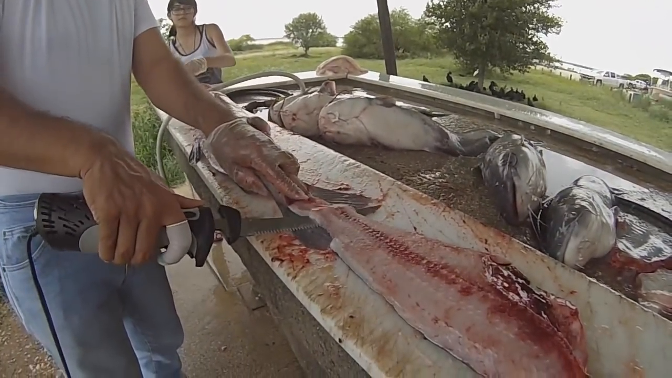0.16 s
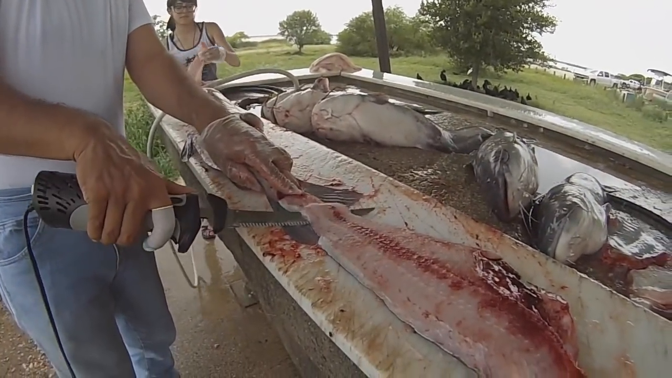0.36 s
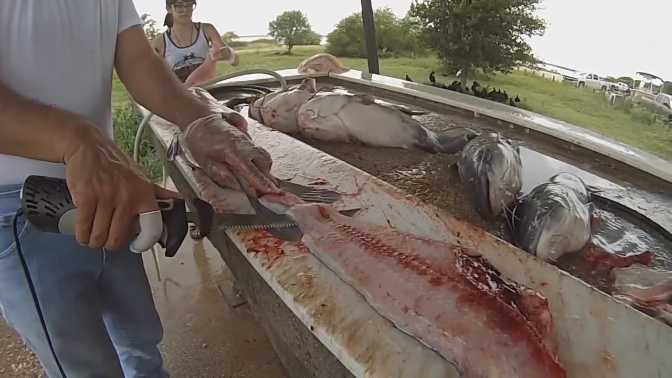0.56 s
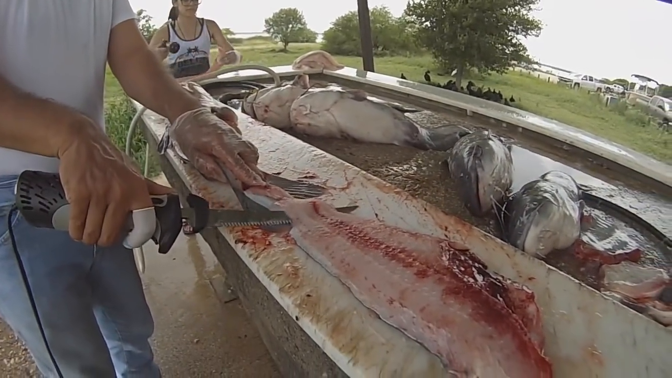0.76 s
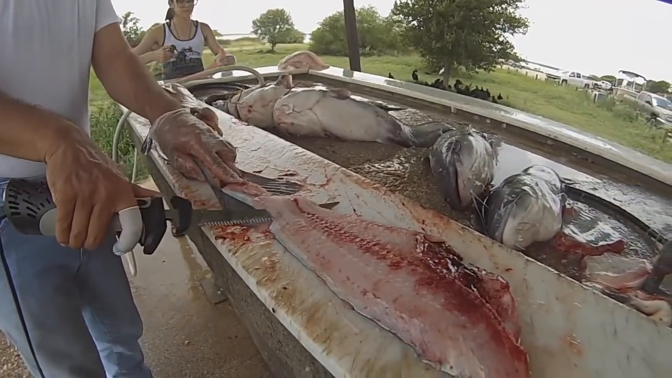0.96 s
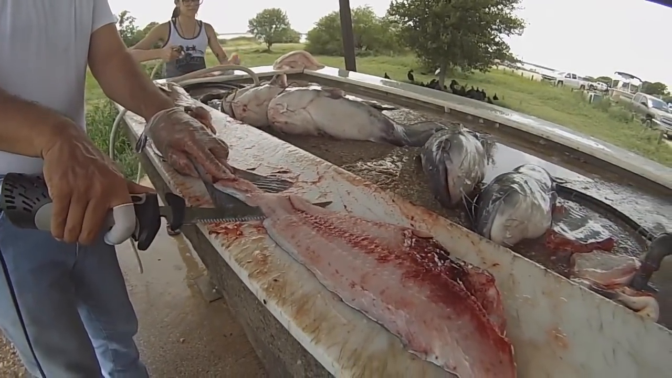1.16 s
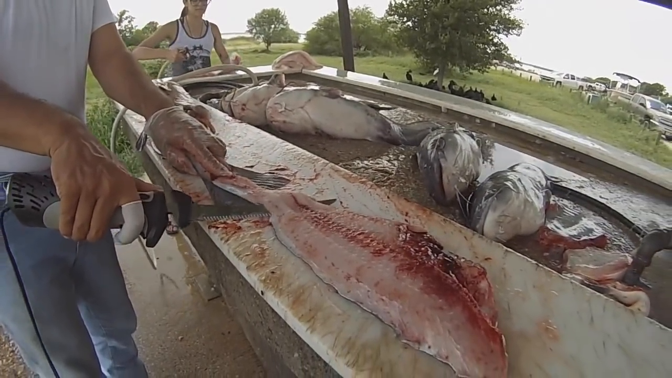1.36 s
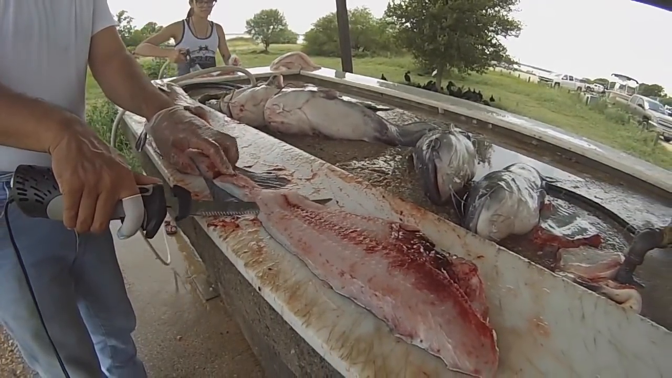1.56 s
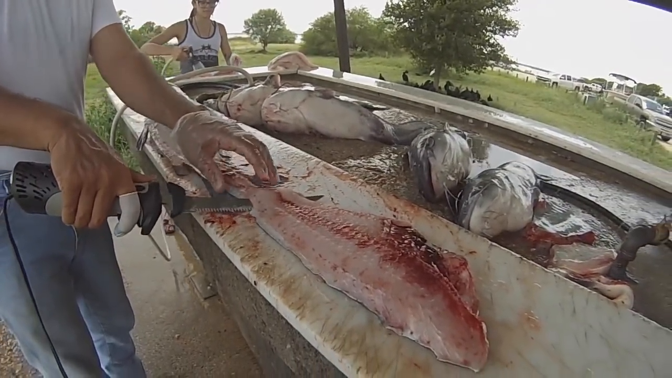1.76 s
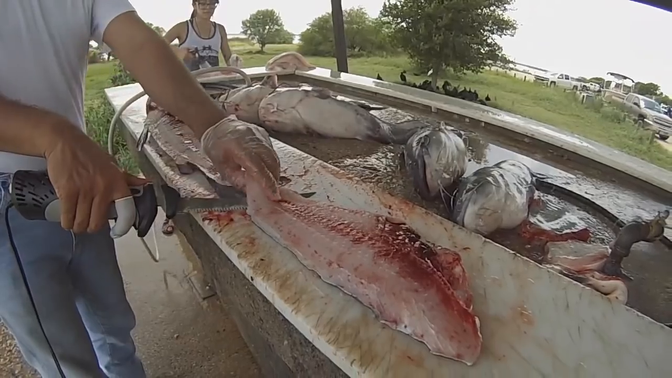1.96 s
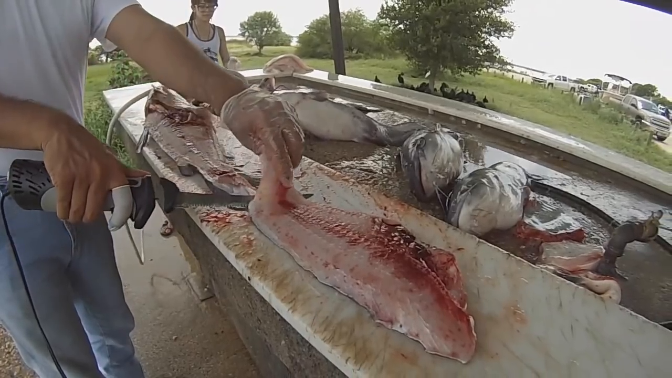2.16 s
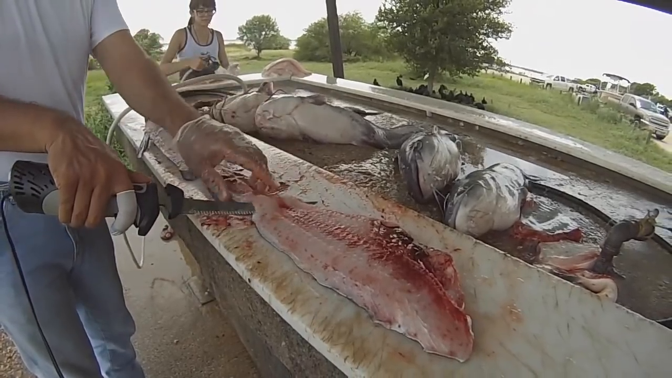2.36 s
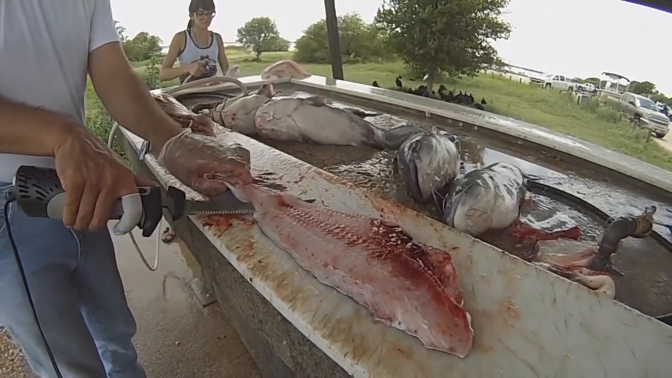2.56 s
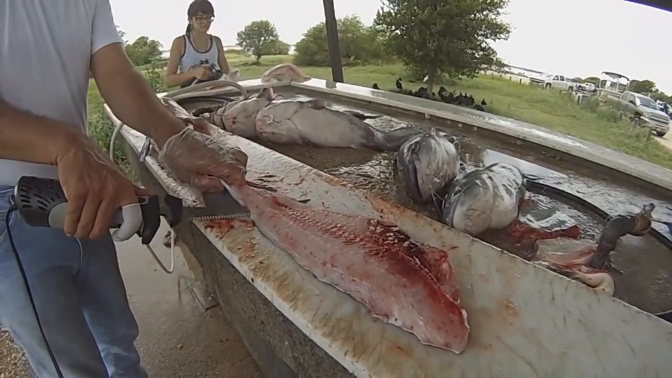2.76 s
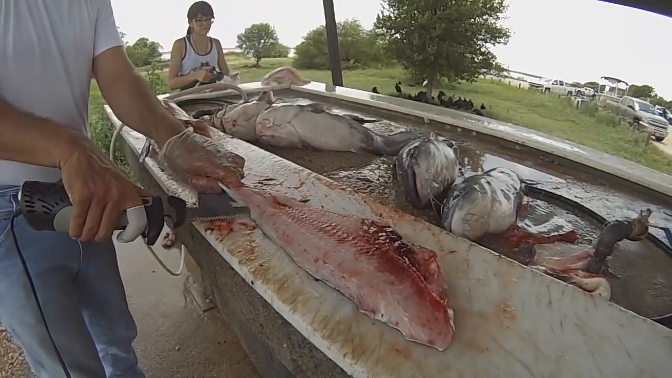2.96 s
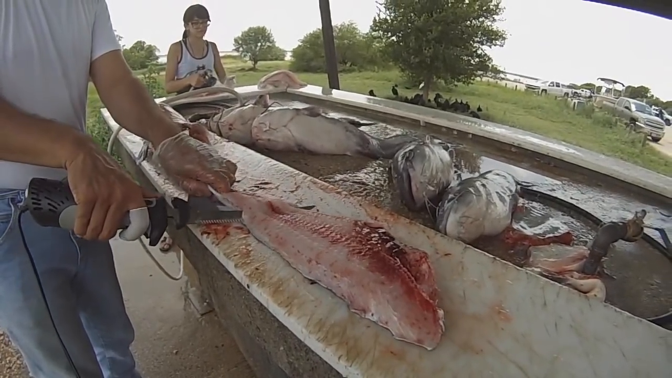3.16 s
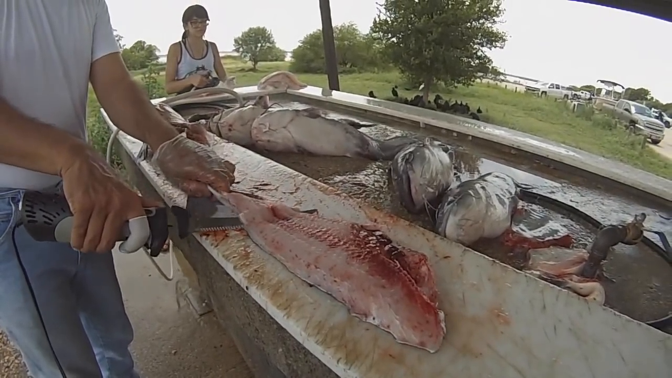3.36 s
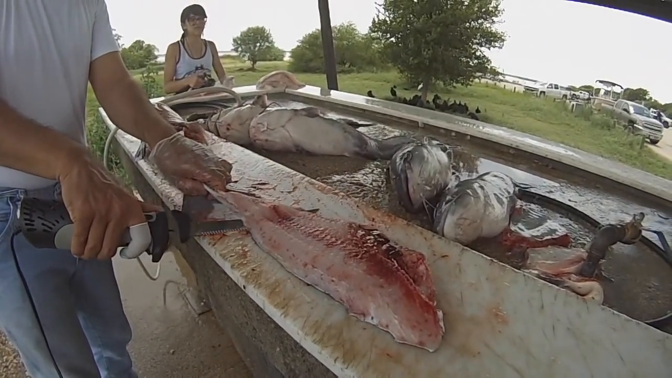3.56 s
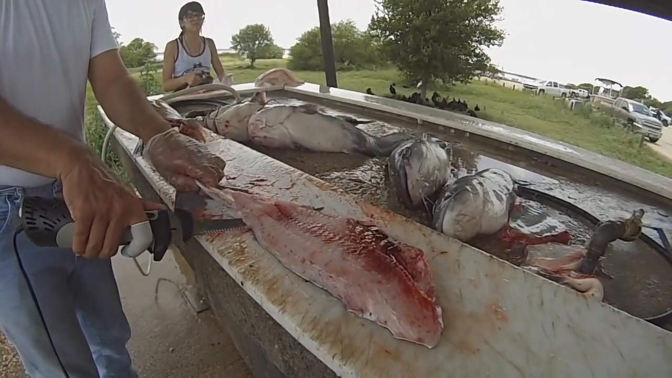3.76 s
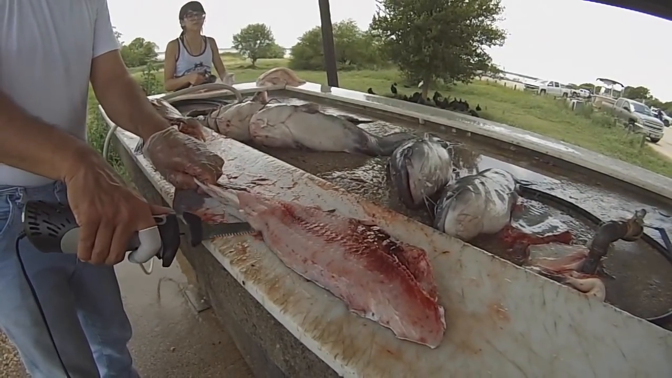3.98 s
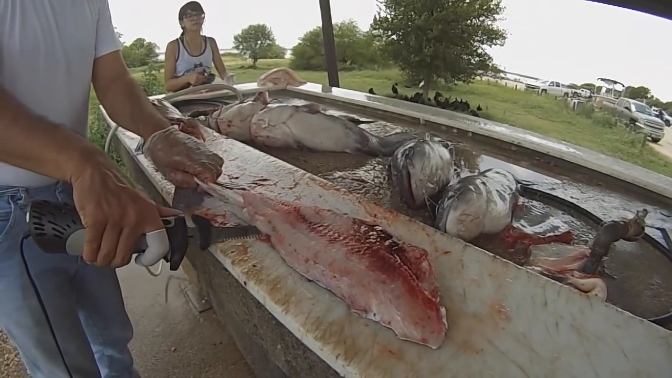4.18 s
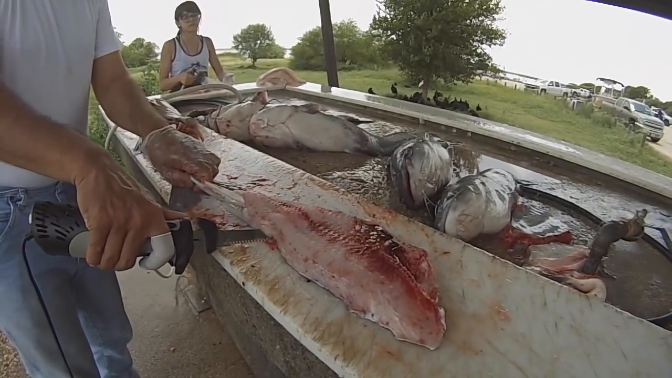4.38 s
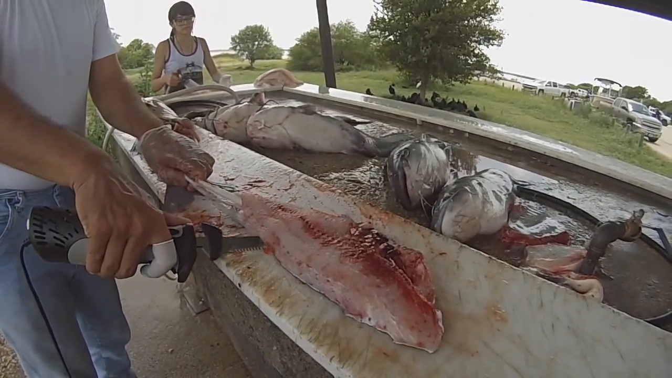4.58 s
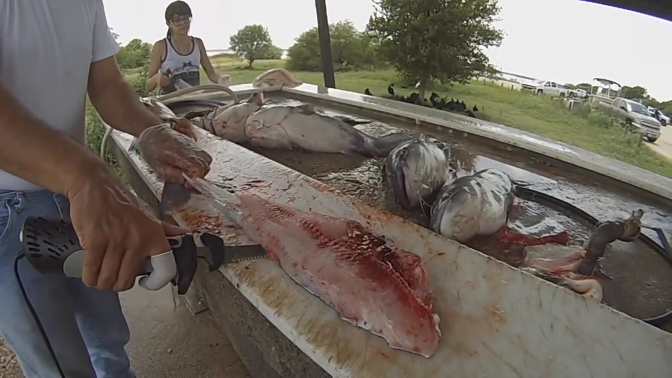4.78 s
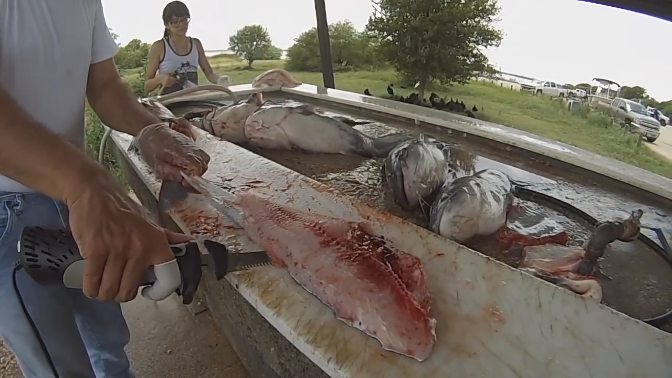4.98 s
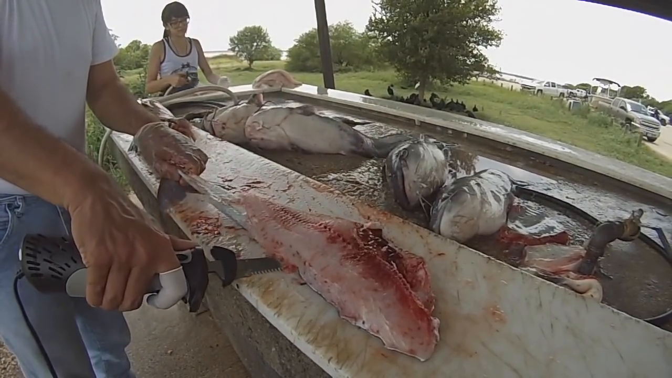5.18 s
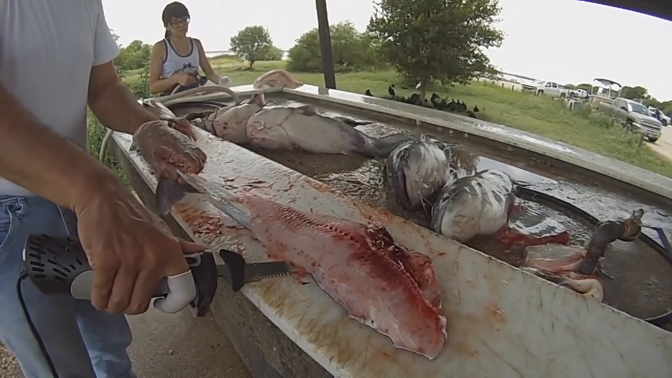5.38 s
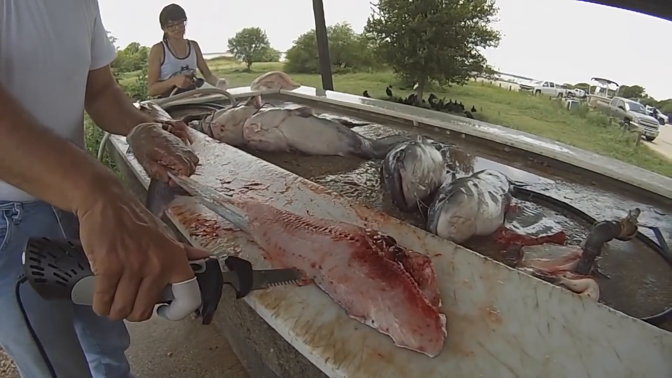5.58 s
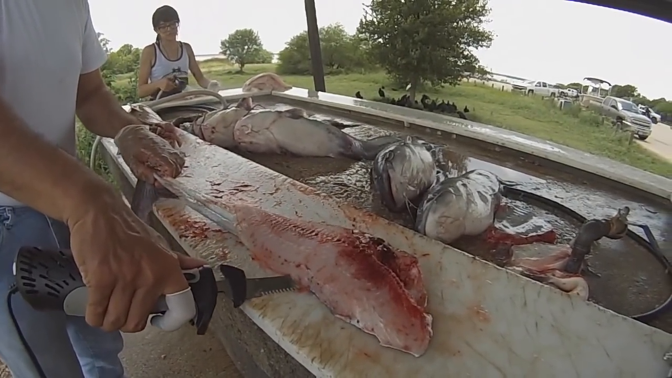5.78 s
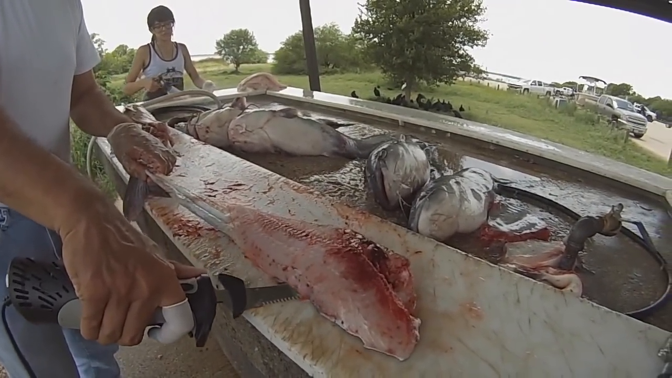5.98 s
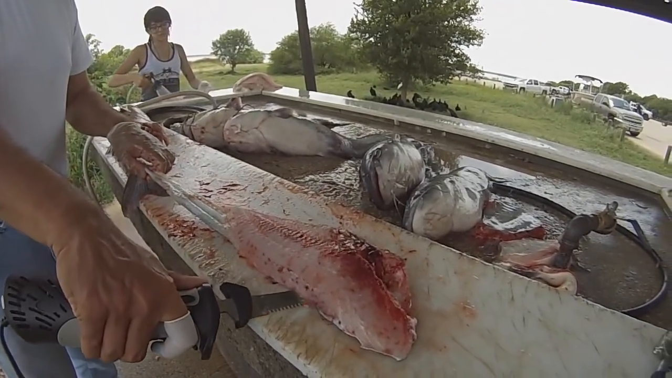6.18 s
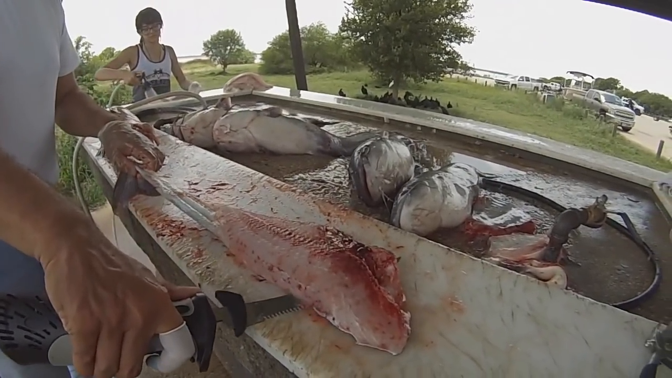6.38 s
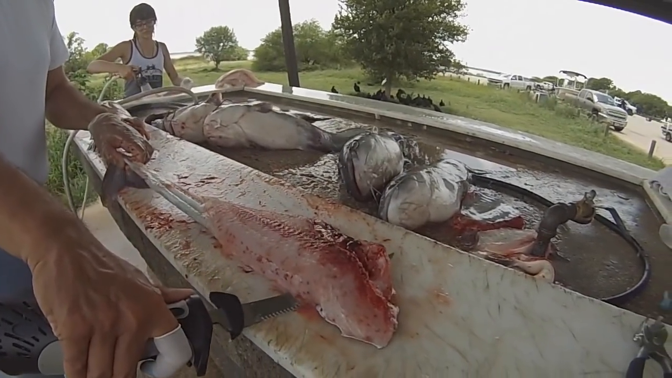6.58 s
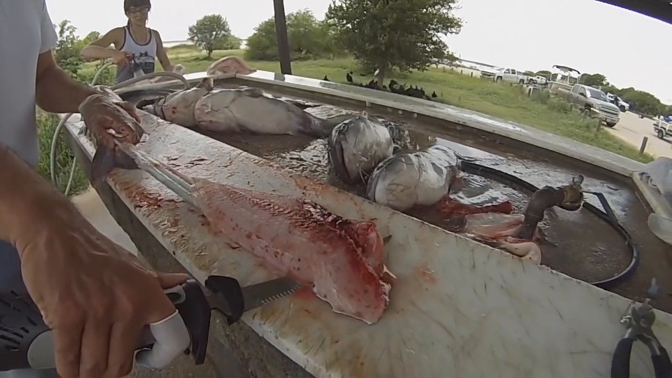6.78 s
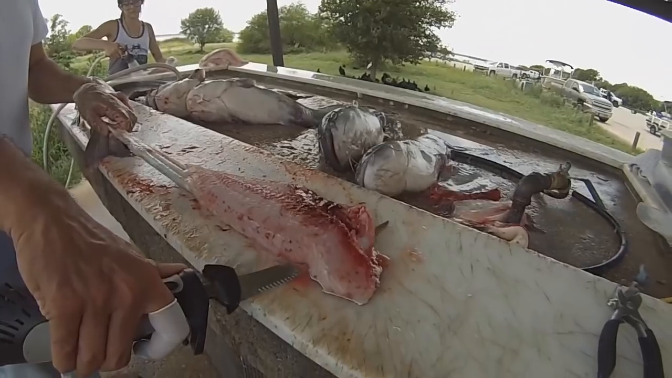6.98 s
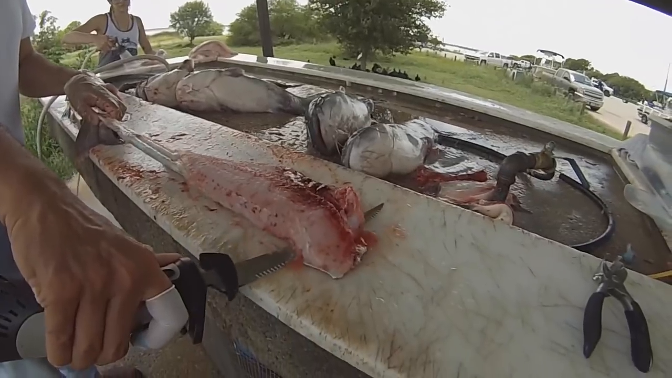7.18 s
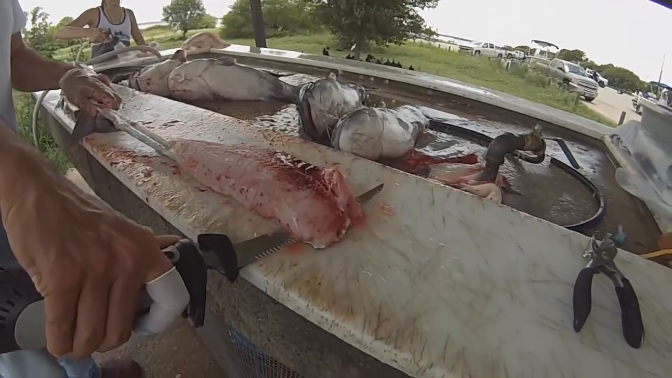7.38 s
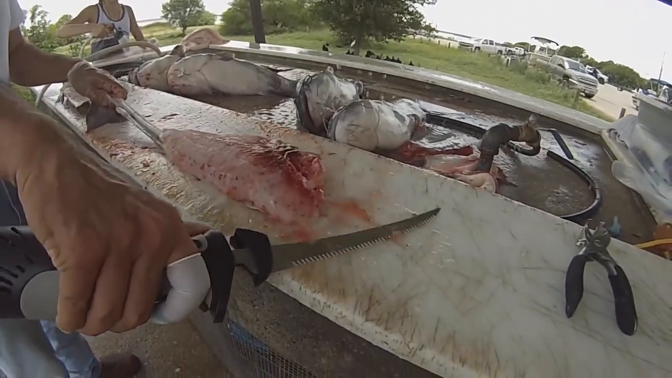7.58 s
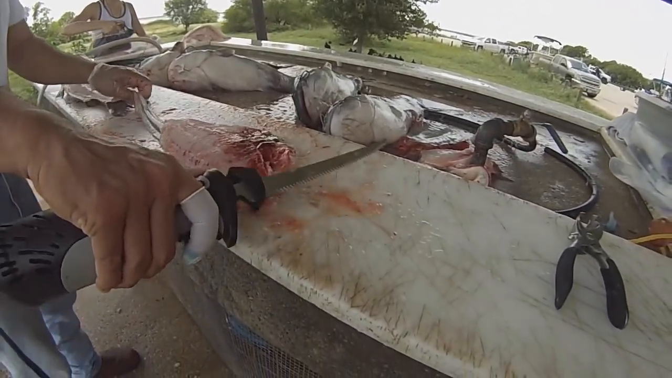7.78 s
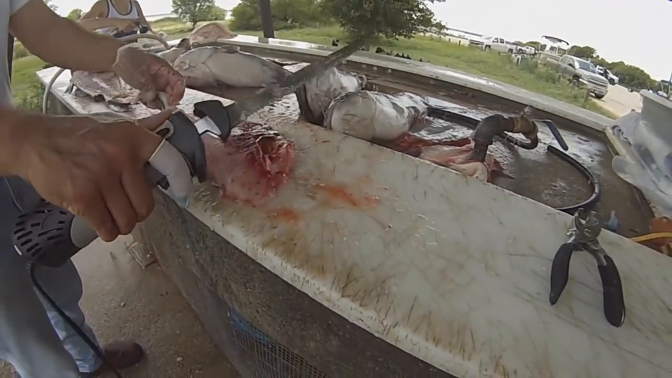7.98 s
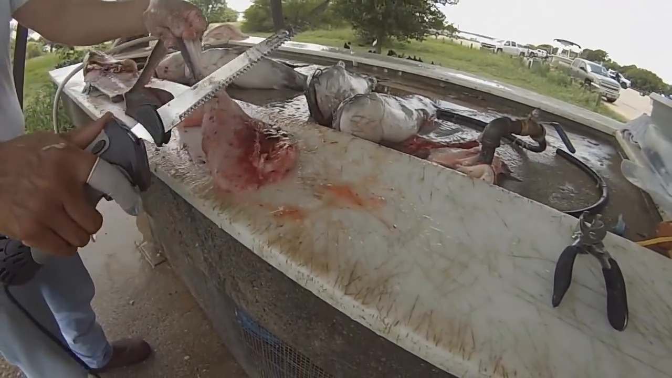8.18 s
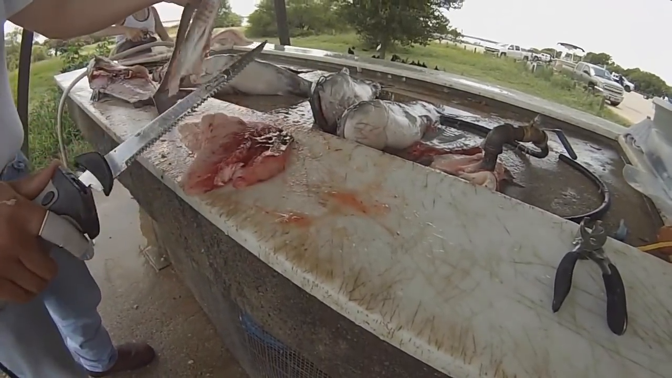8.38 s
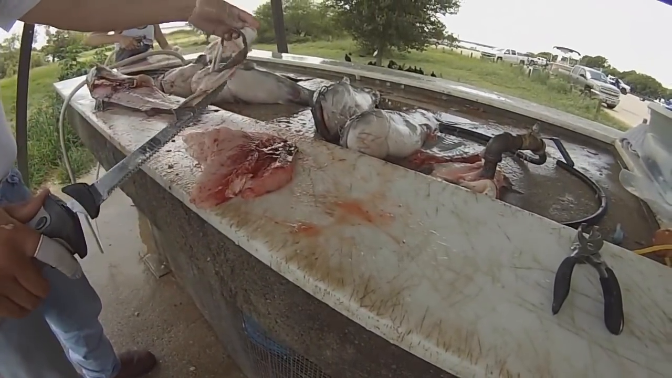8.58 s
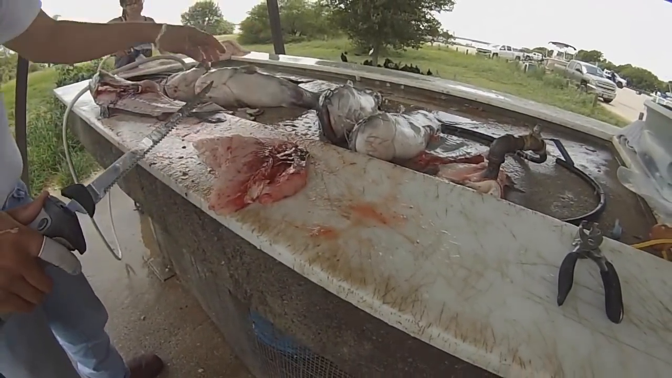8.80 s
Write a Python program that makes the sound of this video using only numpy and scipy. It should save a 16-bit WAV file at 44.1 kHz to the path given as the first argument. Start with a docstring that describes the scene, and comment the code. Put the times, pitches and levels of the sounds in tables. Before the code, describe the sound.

An electric fillet knife buzzes in three short bursts with clacking coasts, then one long rattling cut, before winding down in the open air.

```python
"""Outdoor rumble and insects lie under an electric fillet knife already coasting at the start, on a fish
on a table: three short bursts, one long cut, then it is lifted away. The motor spins up while the trigger
is held and coasts between; its speed sets the rate and loudness of the parts. Teeth rattle and sing in
the plastic housing, the crank knocks at the stroke ends, steel blades scrape, sizzle and clack.
Noise and contact impulses ring filters for these; sines make the motor, the mesh and a far engine."""
import sys
import numpy as np
from scipy import signal
from scipy.fft import rfft, irfft, next_fast_len
from scipy.io import wavfile
from scipy.ndimage import map_coordinates

SR = 44100
rng = np.random.default_rng(int(sys.argv[2]) if len(sys.argv) > 2 else 0)


def store_wav(level_fs):
    """Save 16-bit WAV to argv[1]."""
    pcm = np.round(np.clip(np.atleast_2d(level_fs), -1, 1) * 32767)
    wavfile.write(sys.argv[1], SR, pcm.T.astype(np.int16))


N = 389844

# The grip shifts the two main housing modes. Each row: time in seconds, main mode in Hz, lower mode in Hz.
GRIP_MODES = [(1.06, 1030, 620), (1.38, 1090, 646), (2.2, 1050, 590), (3.3, 1060, 665), (3.9, 1105, 810),
              (4.9, 1143, 770), (6.2, 1096, 800), (7, 1050, 800), (7.66, 970, 760), (7.88, 1106, 800),
              (8.3, 1090, 770), (8.5, 983, 820)]
# Whine of the rotor slots. Each row: multiple of the rotor speed, relative level in dB.
SLOT_WHINE = [(8, 0), (16, -1.5), (24, -3), (32, -7), (40, 0)]
# Single hard blade clacks, and the jolt as the motor starts again at 2.9 s. Each row: time in seconds, #
# relative level in dB, thud against the tick in dB, 60 dB decay of the rebounds in seconds.
SINGLE_CLACKS = [(0.126, -14, 14, 0.02), (.156, -12, 4, 0.0082), (0.184, -9, -2, 0.011),
                 (0.213, -8, 7, .01), (.467, -5.5, 4, 0.016), (.996, -6, -6, 0.019),
                 (1.614, -13.5, 11, .01), (1.64, -4.5, 1, 0.094), (1.674, -11, 13, .03),
                 (1.839, -14.5, -6, .012), (1.873, -11.5, -6, .01), (2.073, -21, 14, 0.019),
                 (2.096, -31, 19, .011), (2.118, -28, 18, .012), (2.145, -35, 8, .012),
                 (2.167, -32, 21, .012), (2.249, -20.5, 8, 0.015), (2.281, -25, 3, .012),
                 (2.314, -21.5, 5, .016), (2.351, -23, -1, .012), (2.385, -28, 16, .012),
                 (2.397, -30, 14, .012), (2.488, -38, 15, .012), (2.523, -36, 1, .012),
                 (2.594, -30, 15, .012), (2.655, -29, -7, 0.013), (2.69, -34, -7, .014),
                 (2.899, -38, 25, 0.088), (2.953, -27, 18, .014), (2.981, -20.5, 14, 0.018),
                 (3.022, -14.5, 12, 0.02), (3.101, -13, 12, .035), (3.132, -11.5, 10, .02),
                 (8.202, -11.5, 8, 0.017), (8.26, -6, -2, 0.022), (8.292, -9, 3, .017),
                 (8.355, -9, -2, .022), (8.442, -9, -5, 0.023), (8.479, -11.5, 3, 0.019),
                 (8.536, -11, -1, 0.012), (8.555, -15, 4, 0.021), (8.642, -14, -12, 0.023),
                 (8.688, -24, 7, .02), (8.713, -23, 3, .02), (8.737, -18, -5, .025),
                 (8.761, -16, -4, 0.026), (8.789, -20, 0, .02), (8.817, -15.5, 2, .025)]
# Colours of the housing, crank knock, blade scrape, wet sizzle, outdoor air, table and blade shanks.
# Each row: frequency in Hz, relative level in dB.
HOUSING_COLOUR = [(100, -29.5), (250, -23), (480, -10.5), (640, -2), (850, 1), (1000, 1), (1300, -1.5),
                  (1480, -4), (1700, -4.5), (2000, -10.5), (2300, -19), (3500, -12.5), (7000, -26),
                  (15000, -39.5)]
CRANK_COLOUR = [(120, -42.5), (400, 5), (800, 9.5), (1200, 5), (1500, 4), (1900, 12), (2500, -26),
                (3300, -22), (4000, -43), (4600, -6), (5400, -2), (6500, -1), (7500, -25), (15000, -50)]
BLADE_COLOUR = [(500, -10), (1900, 2), (2350, -4), (2650, -1), (2900, -1), (3400, 3), (4000, 1), (4600, -2),
                (5300, -6.5), (6400, -6.5), (7300, -14), (8300, -10), (9500, -19), (15000, -23.5)]
SIZZLE_COLOUR = [(4000, -30), (7000, 5.5), (9400, 0.5), (10200, 6), (10900, 9.5), (11600, -6), (12600, -10),
                 (13700, 7), (14600, -9), (15500, -18)]
AIR_COLOUR = [(15, -31), (25, -14), (42, 5), (70, 0), (130, -4), (210, -14), (300, -10.5), (440, -15.5),
              (1000, -19.5), (2000, -27.5), (3500, -27), (7000, -35), (15500, -31)]
TABLE_COLOUR = [(90, -13), (170, -1.5), (220, -19), (330, -7.5), (420, 3), (540, 0.5), (650, 1), (800, 6.5),
                (900, -4), (1500, -11.5), (6000, -89)]
SHANK_COLOUR = [(2500, -30), (3400, -19), (3680, 3.5), (4150, 0), (4520, -12), (5000, -7), (5800, -18.5),
                (6500, -9.5), (7300, -27), (12000, -36)]
# Tones of a far engine. Each row: frequency in Hz, level in dB.
FAR_ENGINE = [(48.5, -71), (122, -51), (152, -54.5), (289, -58.5)]
# Loose drive joints that strike once a stroke. Each row: share of the stroke, relative level in dB.
LOOSE_JOINTS = [(.11, -4.5), (.271, 0.5), (.42, -3.5), (.59, -2.5), (.65, -0.5), (.818, -0.5)]
# Two pitches of the free blade length. Each row: time in seconds, lower pitch in Hz, upper pitch in Hz.
BLADE_PITCHES = [(1.6, 1560, 1940), (2.2, 1660, 2000), (3.6, 1644, 2046), (4.4, 1656, 1970),
                 (5.6, 1710, 2030), (6.4, 1760, 2010), (6.8, 1340, 1870), (7.4, 1360, 1830),
                 (7.65, 1760, 2070), (8.05, 1890, 2010), (8.4, 1750, 1870), (8.84, 1625, 1890)]
# Resonances that lift the whine sweeping through. Each row: centre in Hz, width in Hz, relative level in dB.
FRAME_MODES = [(2620, 170, -4.5), (5270, 400, 4), (6000, 200, -12), (8100, 260, -6), (12000, 500, -9),
               (13850, 620, -16), (14700, 600, -18)]
# The trigger is held. Each row: start in seconds, end in seconds.
TRIGGER_HOLDS = [(.109, .403), (.576, .953), (1.202, 1.51), (2.888, 7.944)]
# Drag of the flesh on the driven blades. Each row: time in seconds, turns per second lost each second.
FLESH_DRAG = [(1.5, 158), (3, 90), (3.75, 203), (4.25, 250), (4.5, 262), (5.05, 308), (5.7, 311),
              (6.3, 328), (6.55, 303), (7.25, 353), (7.55, 322), (7.78, 53)]
# Closeness of the knife to the listener. Each row: time in seconds, gain in dB.
KNIFE_NEARNESS = [(0, 1.5), (.2, 1.95), (1, 0.2), (1.3, 0), (1.65, -0.1), (3.3, 0), (4.45, -0.2),
                  (6.3, 0.6), (7.55, -0.6), (7.88, 5), (8.3, 1), (8.84, 0.5)]
# Spells that fade in and out. Each row: start in seconds, end in seconds, fade in seconds, change in dB.
# In turn: blades bind and the crank knocks harder; they sizzle through wet flesh; they are bent and chafe;
# they lie flat on the table and shake it; they rasp as they come free; the rotor hum swells as they lie
# hard on the table; the skin snags and one stroke end knocks harder.
BIND_SPELLS = [(.12, .225, 0.024, 15), (.5, 1.55, .1, 6), (1.78, 1.92, .04, 12), (4.56, 4.86, 0.078, 9),
               (4.86, 5.45, 0.069, 15), (5.45, 6.52, 0.069, 14.5), (6.52, 7.1, 0.078, 7),
               (7.95, 8.4, 0.18, 5)]
WET_SPELLS = [(.28, 1.08, 0.12, 5.5), (1.08, 1.9, 0.074, 5.5), (3.28, 3.85, 0.056, 4.5),
              (6.25, 7.7, 0.11, 5), (7.7, 8.3, 0.39, 7.5), (8.3, 9, 0.26, 8.5)]
BEND_SPELLS = [(3.7, 4.2, .25, -1), (4.2, 4.72, .1, 5)]
PRESS_SPELLS = [(4.56, 7.9, 0.063, 6)]
RASP_SPELLS = [(7.72, 8.2, 0.17, 7.5)]
HUM_SPELLS = [(6.7, 7.6, .2, 5.5)]
SNAG_SPELLS = [(4.87, 5.05, 0.025, 5.5), (5.05, 5.52, .04, 2.5)]
# Tones of the gear mesh in the case. Each row: cycles a stroke, base level in dB at full speed.
MESH_TONES = [(20, -37), (21, -32), (26, -31.5), (27, -32.5)]
# Ring of the handle at a clack. Each row: centre in Hz, width in Hz, relative level in dB.
HANDLE_MODES = [(570, 91, -11), (1044, 140, -2.5), (1630, 75, -9), (1930, 43, -16)]
# Overtones of the rotor hum, ahead of the case resonance. Each row: multiple of the rotor speed,
# level against the hum in dB.
ROTOR_OVERTONES = [(2, 12), (3, 8), (4, -1)]

# the shaft: rotor turns per stroke, reference and starting speeds (turns/s), starting stroke position
GEAR_RATIO, FULL_SPEED, START_SPEED, START_STROKE = 8.32, 380, 303, .4
# pull from standstill (turns/s per s), speed where a quarter of it is left (turns/s)
STALL_PULL, QUARTER_PULL_SPEED = 5347.8, 187.1
# dry friction (turns/s per s), share of the speed lost per second
FRICTION, DAMPING_PER_S = 149.2, .561
# base level of each part at full speed (dB), power of the speed with which it grows
RATTLE_DB, RATTLE_GROWS = -28, 1.52
SCRAPE_DB, SCRAPE_GROWS = -30.5, 1.51
SIZZLE_DB, SIZZLE_GROWS = -45, 1.25
KNOCK_DB, KNOCK_GROWS = -43.5, 1.65
TABLE_DB, TABLE_GROWS = -41, 0.3
CHAFE_DB, CHAFE_GROWS = -44.5, 9.3
WHINE_DB, WHINE_GROWS = -44.5, 0.84
HUM_DB, HUM_GROWS = -48.5, 0.4
RASP_DB, RASP_GROWS = -40.5, 3.9
SLACK_DB, SLACK_GROWS = -15, 2.2
# the blades clack at reversals below these speeds (turns/s): in flesh, and with none around them
SLACK_SPEED, FREE_SLACK_SPEED = 120, 360
SLACK_THUD_DB, FREE_SLACK_DB = -14, 4.5  # thud against tick, and gain of free clacks
# the lift: centre and fade (s), loss in the table and the housing body, gain in the housing ring (dB)
LIFT_S, LIFT_FADE_S, LIFT_LOSS_DB, LIFT_BODY_DB, LIFT_RING_DB = 7.9, 0.22, 9, 5, 7.5
HUM_LIFT_DB, BLADE_RING_LIFT_DB = 2, 5.5  # gains of the hum and the free blades once lifted
# shares of the pressing dB that reach the housing and the motor and mesh tones
PRESS_RATTLE_SHARE, PRESS_TONE_SHARE = 0.63, 0.42
# scraping gains this share of a wet cut's dB and loses this share of a bind's, as the blades stick
WET_SCRAPE_SHARE, BIND_SCRAPE_LOSS = 0.23, 0.076
POWERED_WHINE_DB, WHINE_DB_PER_DRAG = 7, 0.02  # gain while current flows, and per unit of drag
MAINS_RIPPLE_HZ, BRUSHES_DB = 120, -18  # current pulses, and brush hiss against the whine
JOINT_DRIFT = .008  # scale of the joints' random drift, in strokes
KNOCK_LAG_S = .0006  # the housing answers a knock this long after the shanks
COAST_SPEED, COAST_DEPTH = 275, 0.26  # the rattle pulses below this speed (turns/s), this deeply (0-1)
RASP_HISS_DB = -15  # high hiss of the rasp against its ring
THROB_DB, THROB_HZ = -33, 977
BLADE_RING_DB, BLADE_RING_WIDTH_HZ, LOW_MODE_DB = -15.5, 42, -16  # levels against the rattle
# the case resonance: centre and width, and what it passes away from it
SING_HZ, SING_WIDTH_HZ, SING_FLOOR_DB = 1070, 92, -18
TOP_HZ = 15500


def amp(db):
    """Decibels to gain."""
    return 10 ** (np.asarray(db) / 20)


def unit(x):
    """Scale to rms 1."""
    return x / np.sqrt(np.mean(x ** 2) + 1e-20)


def curves(rows):
    """One value per sample for each column after the time."""
    s, *cols = np.transpose(rows)
    return [np.interp(np.arange(N) / SR, s, c) for c in cols]


def ramp(at_s, fade_s):
    """A rise from 0 to 1, centred on a moment."""
    return np.clip((np.arange(N) / SR - at_s) / fade_s + .5, 0, 1)


def spells(rows):
    """A level in dB that fades in, holds and fades out once for each row."""
    return sum(db * (ramp(start, fade) - ramp(end, fade)) for start, end, fade, db in rows)


def wobble(rate):
    """A smooth random curve, rate knots a second."""
    return map_coordinates(rng.standard_normal(int(N * rate / SR) + 4), [np.arange(N) * rate / SR])


def coloured(x, points, size=4096):
    """x through a causal minimum-phase filter of energy 1 with the given (Hz, dB) outline."""
    hz, db = np.transpose(points)
    gain = amp(np.interp(np.log(np.fft.rfftfreq(size, 1 / SR) + 1), np.log(hz), db))
    cepstrum = irfft(np.log(gain))
    cepstrum[1:size // 2] *= 2
    cepstrum[size // 2 + 1:] = 0
    response = irfft(np.exp(rfft(cepstrum)))
    return signal.fftconvolve(x, response / np.linalg.norm(response))[:N]


def mode(x, hz, width_hz):
    """x through one resonance of energy 1, whose centre may move."""
    turn = np.exp(2j * np.pi * np.cumsum(hz * np.ones(N)) / SR)
    pole = np.exp(-np.pi * width_hz / SR)
    return np.real(turn * signal.lfilter([np.sqrt(2 * (1 - pole ** 2))], [1, -pole], x / turn))


def contacts(stroke, places, sizes, jitter, scatter_db):
    """Impulses at fixed places of every stroke, with scatter in time and size."""
    count = int(stroke[-1]) + 1
    chance = rng.standard_normal((count, len(places), 2))
    when = np.arange(count)[:, None] + places + jitter * chance[..., 0]
    at = np.searchsorted(stroke, when.ravel())
    hits = np.bincount(at, (sizes * amp(scatter_db * chance[..., 1])).ravel(), N + 1)[:N]
    hits[0] = 0
    return hits


def chatter(hits, t60):
    """Each contact trails off in a short noise burst of tiny rebounds."""
    fade = amp(-60 * np.arange(SR // 10) / SR / t60) ** 2
    energy = signal.fftconvolve(hits ** 2, fade / fade.sum())[:N]
    return np.sqrt(np.abs(energy)) * rng.standard_normal(N)


def burst(t60, size=4410):
    """One contact of energy 1; the longer its rebounds last, the more of it goes into them."""
    tail = unit(amp(-60 * np.arange(size) / SR / t60) * rng.standard_normal(size)) * t60 / .008
    tail[0] = np.sqrt(size)
    return unit(tail) / np.sqrt(size)


def gate(stroke, place, width):
    """A smooth bump once a stroke."""
    return np.exp(-(np.sin(np.pi * (stroke - place)) / (np.pi * width)) ** 2)


def loudness(speed, full_db, grows):
    """Level in dB of a part of the knife: a power of the speed, and more when it is near."""
    return full_db + grows * 20 * np.log10(speed / FULL_SPEED) + curves(KNIFE_NEARNESS)[0]


def sing(hz):
    """Gain of a tone in the case: it stands out only while it passes the resonance."""
    return amp(SING_FLOOR_DB) + 1 / (1 + (2 * (hz - SING_HZ) / SING_WIDTH_HZ) ** 2)


def shaft():
    """Trigger state and turns per second: the pull weakens with speed, against drag and friction."""
    step = .001
    t = np.arange(0, N / SR, step)
    held = sum((t > start - step / 2) & (t < end - step / 2) for start, end in TRIGGER_HOLDS)
    drags = np.interp(t, *np.transpose(FLESH_DRAG))
    speed, speeds = START_SPEED, []
    for on, drag in zip(held.tolist(), drags.tolist()):
        pull = STALL_PULL / (1 + speed / QUARTER_PULL_SPEED) ** 2
        change = on * (pull - drag) - FRICTION - DAMPING_PER_S * speed
        speed = max(speed + step * change, 1)
        speeds.append(speed)
    return curves(np.transpose([t, held, speeds]))


def outdoors():
    """Filtered noise for rumble and insects, wavering sines for a far engine."""
    air = amp(-43.5) * unit(coloured(rng.standard_normal(N), AIR_COLOUR))
    t = np.arange(N) / SR
    engine = sum(amp(db + 1.2 * wobble(6.1)) * np.sin(2 * np.pi * hz * t + 0.5 * wobble(11))
                 for hz, db in FAR_ENGINE)
    insects = mode(mode(rng.standard_normal(N), 10250, width_hz=1300), 10250, width_hz=1300)
    return air + engine + amp(-53.0) * unit(insects)


def motor(turns, speed, held, press_db, lifted):
    """The unbalanced rotor hums; its slots whine, pulsed by the mains, through the frame's resonances."""
    angle = 2 * np.pi * (turns + .002 * wobble(60))
    ripple = 2 * np.pi * MAINS_RIPPLE_HZ * np.arange(N) / SR

    def frame(hz):
        return sum(amp(db) / (1 + (2 * (hz - centre) / width) ** 2) for centre, width, db in FRAME_MODES)

    def slot(order, side):
        tone = np.sin(order * angle + side * ripple + .3 * wobble(300))
        return frame(order * speed + side * MAINS_RIPPLE_HZ) * tone

    whine = 0
    for order, db in SLOT_WHINE:
        # powered side tones: one ripple below, 0.64 of a ripple above
        tones = slot(order, 0) + held * (slot(order, -1) + slot(order, 0.64))
        whine = whine + amp(db + 1.7 * wobble(70)) * tones / 2
    brushes = amp(BRUSHES_DB) * sum(amp(db) * mode(rng.standard_normal(N), centre, width)
                                    for centre, width, db in FRAME_MODES)
    current_db = held * (POWERED_WHINE_DB + WHINE_DB_PER_DRAG * curves(FLESH_DRAG)[0])
    whine_gain = amp(loudness(speed, WHINE_DB, WHINE_GROWS) + current_db)

    overtones = sum(amp(db + 2 * wobble(25)) * sing(order * speed)
                    * np.sin(order * angle + 0.23 * wobble(40)) for order, db in ROTOR_OVERTONES)
    table_db = PRESS_TONE_SHARE * press_db + spells(HUM_SPELLS) + HUM_LIFT_DB * lifted
    spinning = 1 / (1 + (200 / speed) ** 8)  # the hum fades out at low speed
    hum_gain = spinning * amp(loudness(speed, HUM_DB, HUM_GROWS) + table_db)
    hum = hum_gain * (amp(wobble(14)) * np.sin(angle) + overtones)
    return whine_gain * (whine + brushes) + hum


def coasting(stroke, speed):
    """Gain that gathers the rattle of a slow drive into two pulses a stroke."""
    depth = COAST_DEPTH / (1 + (speed / COAST_SPEED) ** 10)
    return 1 - depth + depth * unit(gate(stroke, 0.74, 0.098) + 0.57 * gate(stroke, 0.16, 0.17))


def gears(stroke, speed, press_db, lifted, count=25):
    """Loose joints and gear teeth rattle; they ring the housing, the blades and, through them, the table."""
    def strikes(place):
        wandering = stroke + JOINT_DRIFT * wobble(2)
        return contacts(wandering, np.array([place]), 1, jitter=.007, scatter_db=2)

    joints = unit(sum(amp(db) * strikes(place) for place, db in LOOSE_JOINTS) / np.sqrt(speed))
    teeth = contacts(stroke, np.arange(count) / count, 1, jitter=.01, scatter_db=1)
    teeth = teeth * rng.standard_normal(N) / np.sqrt(speed)
    swing = 1.06 + gate(stroke, 0.09, 0.77) + gate(stroke, 0.55, 0.21)
    rattle = unit(unit(teeth + chatter(teeth, t60=0.06)) * swing)
    hard = .8 * np.clip(speed / FULL_SPEED, 0, 1)  # a slow drive grinds more than it knocks
    drive = coasting(stroke, speed) * (hard * joints + np.sqrt(1 - hard ** 2) * rattle)

    main_hz, low_hz = curves(GRIP_MODES)
    rings = amp(-7.5 + LIFT_RING_DB * lifted) * mode(drive, main_hz, width_hz=158)
    rings = rings + amp(LOW_MODE_DB) * mode(drive, low_hz, width_hz=62)
    blade_ring = sum(mode(drive, hz, BLADE_RING_WIDTH_HZ) for hz in curves(BLADE_PITCHES))
    rings = rings + amp(BLADE_RING_DB + BLADE_RING_LIFT_DB * lifted) * blade_ring
    body = amp(-3.5 - LIFT_BODY_DB * lifted) * coloured(drive, HOUSING_COLOUR)
    housing_db = loudness(speed, RATTLE_DB, RATTLE_GROWS) + PRESS_RATTLE_SHARE * press_db
    table_db = loudness(speed, TABLE_DB, TABLE_GROWS) + press_db - LIFT_LOSS_DB * lifted
    table = unit(coloured(hard * joints + 0.17 * rattle, TABLE_COLOUR))
    return amp(housing_db) * (body + rings) + amp(table_db) * table


def mesh(stroke, speed, press_db):
    """The meshing teeth give rough, wavering tones, louder when the blades press on the table."""
    def tone(order):
        wave = np.sin(2 * np.pi * order * stroke + .5 * wobble(45))
        return sing(order * speed / GEAR_RATIO) * amp(3 * wobble(30)) * wave

    return sum(amp(loudness(speed, db, grows=4.9) + PRESS_TONE_SHARE * press_db) * tone(order)
               for order, db in MESH_TONES)


def crank(stroke, speed):
    """The crank takes up slack at both stroke ends: the blade shanks snap, then the housing knocks."""
    def ends(first_db):
        sizes = amp([first_db, 0])
        return contacts(stroke, np.array([.11, .59]), sizes, jitter=.002, scatter_db=1) / np.sqrt(speed)

    snaps = ends(first_db=2.5)
    snap = unit(snaps + .42 * chatter(snaps, t60=.007))
    blows = np.roll(ends(first_db=-1.5), round(KNOCK_LAG_S * SR))
    knock = unit(blows + .4 * chatter(blows, t60=.008))
    housing = amp(-4.0) * coloured(knock, CRANK_COLOUR)
    housing = housing + amp(-6.0) * mode(knock, curves(GRIP_MODES)[0], width_hz=30)
    snag_db = spells(SNAG_SPELLS) * gate(stroke, .62, .2)
    level_db = loudness(speed, KNOCK_DB, KNOCK_GROWS) + spells(BIND_SPELLS) + snag_db
    return amp(level_db) * (amp(-0.5) * coloured(snap, SHANK_COLOUR) + housing)


def blades(stroke, speed):
    """Serrated steel rubs on steel in spurts that repeat with the stroke and run together at speed."""
    spurts = .5 * speed / FULL_SPEED + gate(stroke, 0.17, 0.064)
    spurts = spurts + 0.64 * gate(stroke, 0.96, 0.53) + 0.5 * gate(stroke, 0.35, 0.051)

    def rub(grain_db):
        return unit(spurts * amp(grain_db * wobble(700)) * rng.standard_normal(N))

    wet_db = spells(WET_SPELLS)
    scrape_db = loudness(speed, SCRAPE_DB, SCRAPE_GROWS) + WET_SCRAPE_SHARE * wet_db
    scrape_db = scrape_db - BIND_SCRAPE_LOSS * spells(BIND_SPELLS) + 1.1 * wobble(12)
    scrape = amp(scrape_db) * coloured(rub(grain_db=1.5), BLADE_COLOUR)
    sizzle_db = loudness(speed, SIZZLE_DB, SIZZLE_GROWS) + wet_db + 0.33 * wobble(7)
    sizzle = amp(sizzle_db) * coloured(rub(grain_db=4.0), SIZZLE_COLOUR)
    rasp = mode(rub(grain_db=7.5), 4950, width_hz=650)
    rasp = rasp + amp(RASP_HISS_DB) * mode(rub(grain_db=4.0), 13200, width_hz=1300)
    rasp = amp(loudness(speed, RASP_DB, RASP_GROWS) + spells(RASP_SPELLS)) * rasp
    chafe = mode(unit(gate(stroke, 0.79, 0.098) * rng.standard_normal(N)), 7980, width_hz=320)
    chafe = amp(loudness(speed, CHAFE_DB, CHAFE_GROWS) + spells(BEND_SPELLS)) * chafe
    return scrape + sizzle + rasp + chafe


def clacks(stroke, speed, lifted):
    """Loose blades snap on their holder, singly and at each slow or free reversal, and the motor jolts as it
    starts: a tick over a thud."""
    slack_speed = SLACK_SPEED + (FREE_SLACK_SPEED - SLACK_SPEED) * lifted
    slack = 1 / (1 + (speed / slack_speed) ** 12)
    reversals = contacts(stroke, np.array([.12, .6]), 1, jitter=.005, scatter_db=2)
    slack_db = loudness(speed, SLACK_DB, SLACK_GROWS) + FREE_SLACK_DB * lifted
    reversals = reversals * slack * amp(slack_db)
    ticks = .5 * reversals + chatter(reversals, t60=0.024)
    thuds = ticks * amp(SLACK_THUD_DB - LIFT_LOSS_DB * lifted)
    for s, db, thud_db, t60 in SINGLE_CLACKS:
        at = round(s * SR)
        tick, thud = burst(t60)[:N - at], burst(t60)[:N - at]
        ticks[at:at + len(tick)] += amp(db) * tick
        thuds[at:at + len(thud)] += amp(db + thud_db) * thud
    steel = amp(8) * coloured(ticks, BLADE_COLOUR)
    handle = sum(amp(db) * mode(thuds, hz, width) for hz, width, db in HANDLE_MODES)
    return steel + handle + .4 * coloured(thuds, HOUSING_COLOUR) + .3 * coloured(thuds, TABLE_COLOUR)


def throb(stroke, speed, lifted):
    """Held in the air and slowing, the housing rings in pulses with the swing of the blades."""
    slow = 1 / (1 + (speed / 270) ** 10)
    swings = contacts(stroke, np.array([.14, .72, .8]), amp([-2, 0, -3]), jitter=.015, scatter_db=1.5)
    swings = swings + .4 * chatter(swings, t60=.02)
    ring = mode(mode(swings, THROB_HZ, width_hz=130), THROB_HZ, width_hz=260)
    return amp(THROB_DB) * slow * lifted * unit(ring)


def scene():
    """One shaft speed drives every part of the knife."""
    held, speed = shaft()
    turns = np.cumsum(speed) / SR
    stroke = turns / GEAR_RATIO + START_STROKE
    press_db, lifted = spells(PRESS_SPELLS), ramp(LIFT_S, LIFT_FADE_S)
    knife = motor(turns, speed, held, press_db, lifted)
    knife = knife + gears(stroke, speed, press_db, lifted) + mesh(stroke, speed, press_db)
    knife = knife + crank(stroke, speed) + blades(stroke, speed)
    knife = knife + clacks(stroke, speed, lifted) + throb(stroke, speed, lifted)
    return (outdoors() + knife)[None]


def record(dry):
    """Remove everything above the band limit."""
    size = next_fast_len(N + SR // 2)
    passed = np.fft.rfftfreq(size, 1 / SR) < TOP_HZ
    return irfft(rfft(dry, size) * passed, size)[..., :N]


dry = scene()
out = record(dry)
store_wav(out)
```